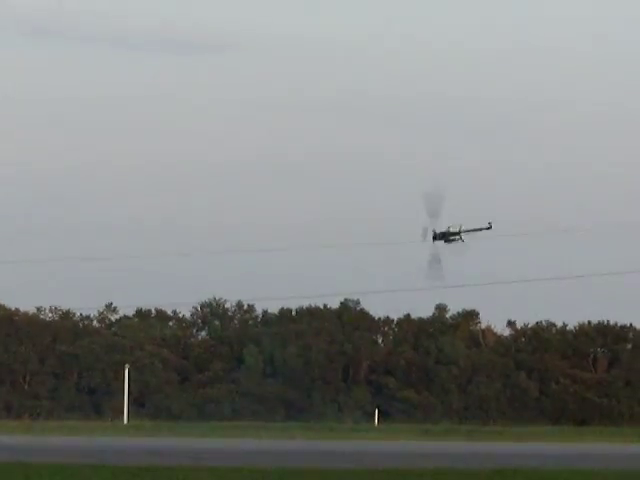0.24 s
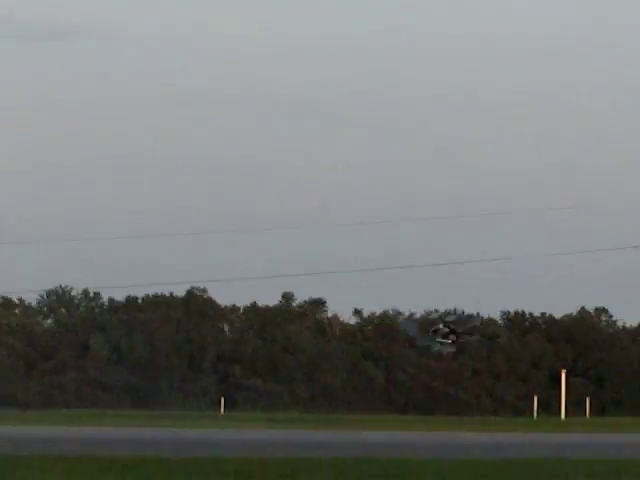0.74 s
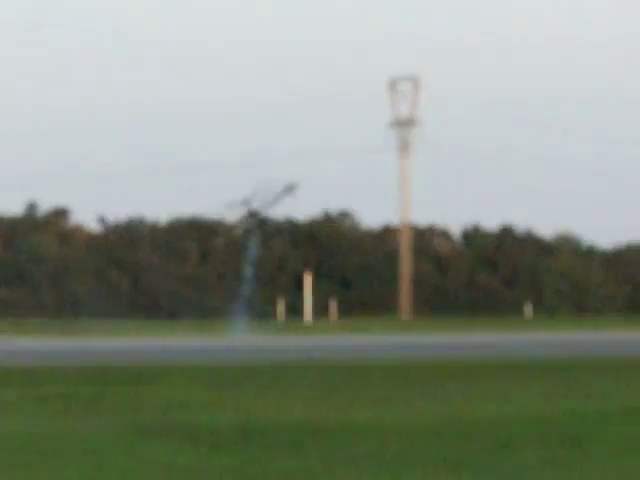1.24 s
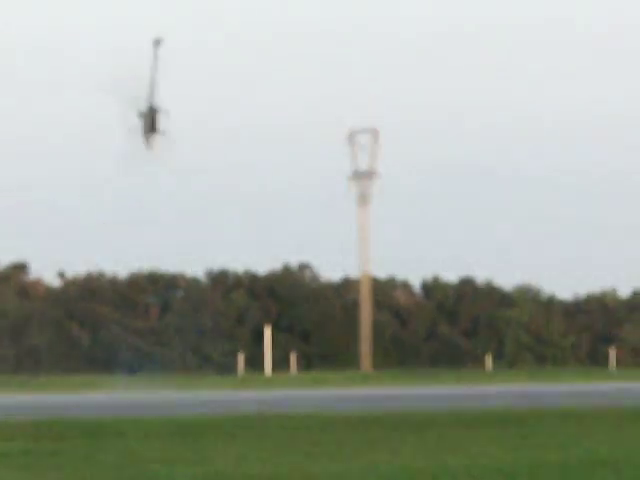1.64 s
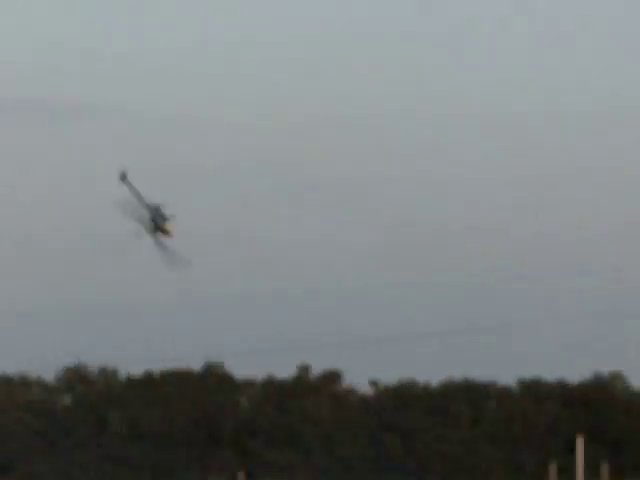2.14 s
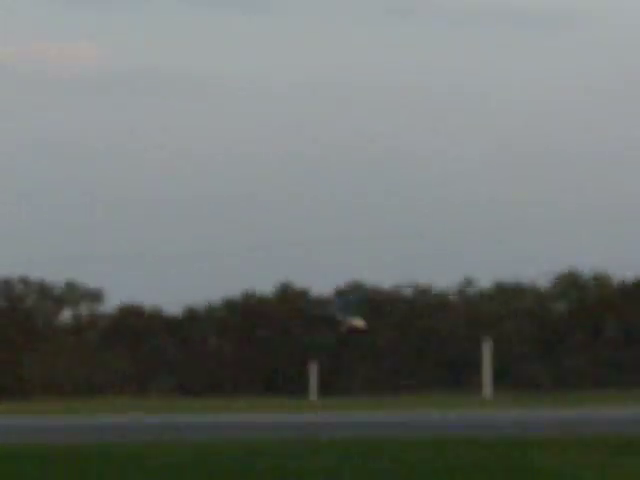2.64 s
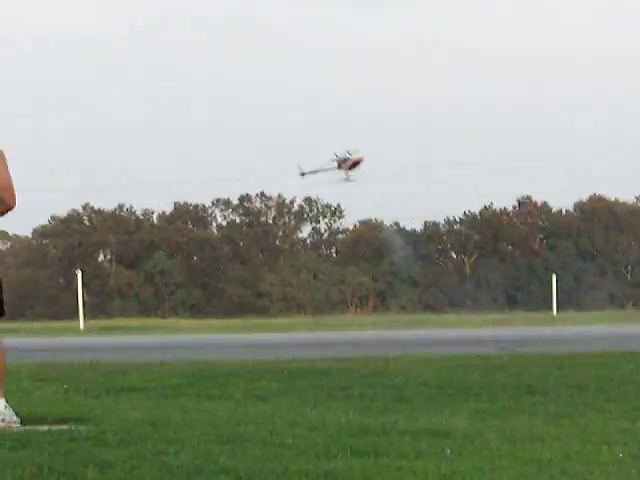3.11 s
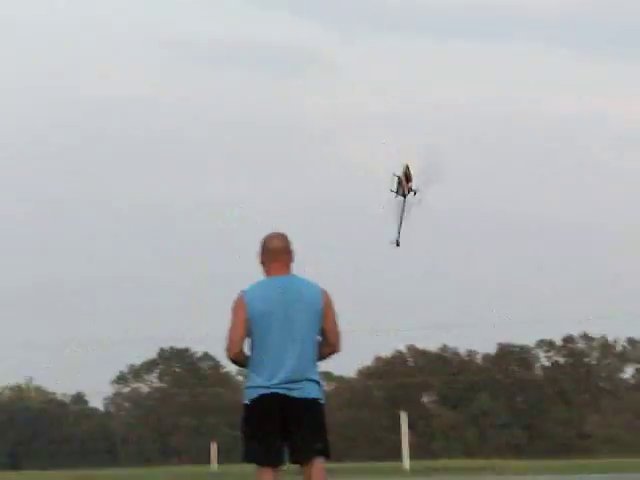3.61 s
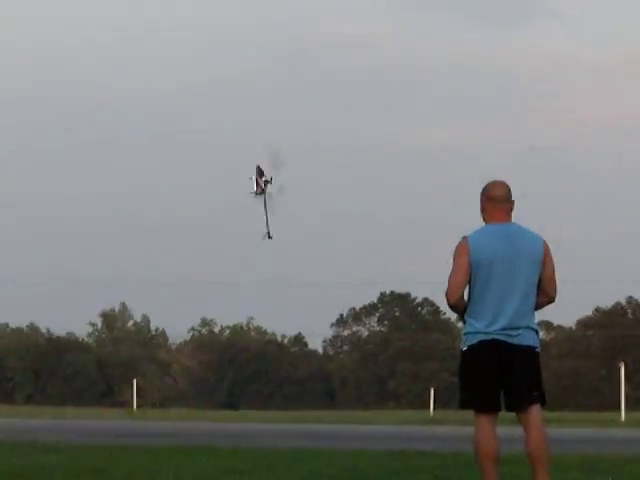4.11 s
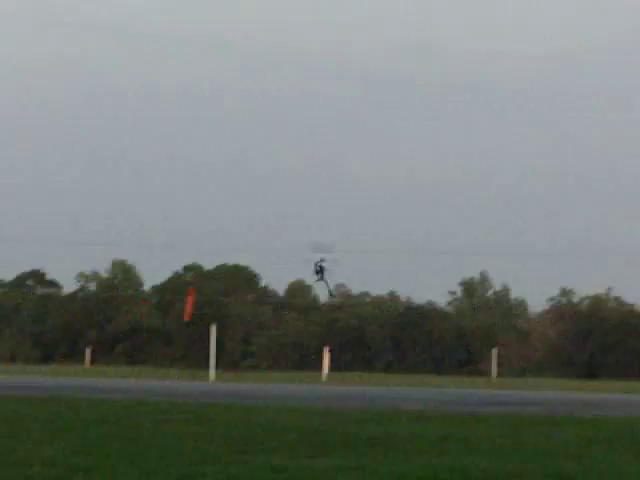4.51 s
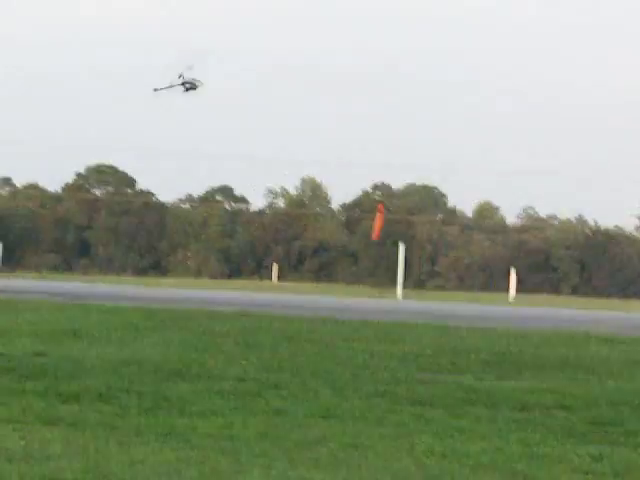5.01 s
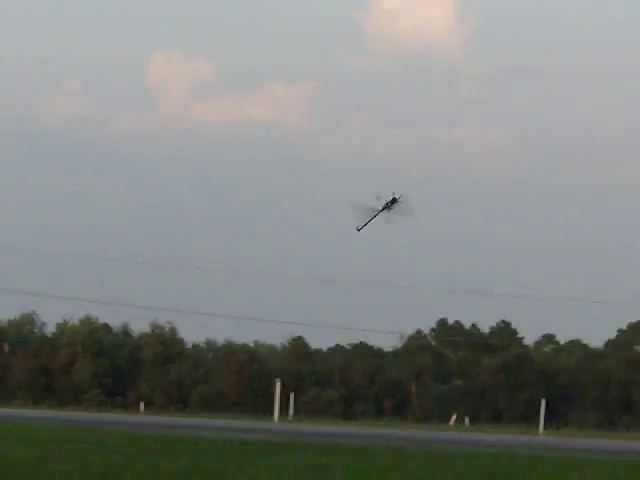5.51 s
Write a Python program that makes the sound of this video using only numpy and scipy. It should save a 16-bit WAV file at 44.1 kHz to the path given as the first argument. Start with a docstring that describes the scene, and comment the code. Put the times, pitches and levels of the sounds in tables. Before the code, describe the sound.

A small glow-engine model helicopter flies hard over a grass field. Its piercing, nasal exhaust whine continuously climbs and sags, with a hollow sweeping colour from the ground echo. Rapid rotor flutter runs underneath, and six short pulls bring harsh, ripping blade slaps. The outdoor space is open and almost dry, captured by a small stereo microphone with a limited top end.

```python
"""A model helicopter with a two-stroke glow engine flips and swoops over an open field.
From the start its exhaust whines, gears tie both rotors to the engine, and a light hush lies under all.
The firing rate then rises and sags again and again, while the ground echo combs the whine.
Now and then one gliding harmonic rings out; from 0.8 s on, six hard pulls make the blades slap.
Pops are sums of cosines, rotor thumps and hums are low tones, and hiss and slaps are shaped noise."""
import sys
import numpy as np
from scipy import signal
from scipy.fft import rfft, irfft
from scipy.io import wavfile

SR = 44100
rng = np.random.default_rng(int(sys.argv[2]) if len(sys.argv) > 2 else 0)


def generate_wav(signal):
    """Clip the signal to [-1, 1] and save it as 16-bit WAV at the path in sys.argv[1]."""
    frames = np.transpose(np.atleast_2d(signal))
    scaled = np.clip(frames, -1, 1) * 32767
    pcm = np.round(scaled).astype(np.int16)
    wavfile.write(sys.argv[1], SR, pcm)


N = 253575
TIME = np.arange(N) / SR


def amp(db):
    """Turns decibels into a gain."""
    return 10 ** (np.asarray(db) / 20)


def unit(x):
    """Scales a sound to an rms (average strength) of one."""
    return x / np.sqrt(np.mean(x ** 2) + 1e-20)


def curves(rows, t=TIME):
    """Joins each column of a table by straight lines in time."""
    s, *columns = np.transpose(rows)
    return [np.interp(t, s, column) for column in columns]


def read(points, hz):
    """Reads a table of values along a logarithmic frequency axis."""
    f, value = np.transpose(points)
    return np.interp(np.log(hz + 1), np.log(f + 1), value)


def colour(x, points):
    """Filters a sound by a spectrum in dB; the result has an rms of one."""
    gain = amp(read(points, np.fft.rfftfreq(N, 1 / SR)))
    return unit(irfft(rfft(x) * gain, N))


def wander(hz):
    """Smooth chance with an rms of one, fading out above about hz."""
    smoothing = np.exp(-(np.fft.rfftfreq(N, 1 / SR) / hz) ** 2)
    return unit(irfft(rfft(rng.standard_normal(N)) * smoothing, N))


def puffs(turns, length, between):
    """A burst of noise once a turn, dying within a share of the turn, over a steady hiss."""
    strength = between + np.exp(-(turns % 1) / length)
    return unit(strength * rng.standard_normal(N))


def ticks(turns):
    """One sharp pulse a turn, a little uneven in strength."""
    pulse = np.diff(np.floor(turns), prepend=0)
    return unit(pulse * (1 + .2 * wander(40)))


def swell(s, half):
    """A smooth rise and fall around a moment."""
    return np.exp(-.5 * ((TIME - s) / half) ** 2)


def pulls():
    """Strength of the blades' crack and of their thud through the hard pulls."""
    # hard pulls, when the blades strike their own wake: t/s, half length/s, crack level/dB, thud level/dB
    moments = [(0.803, 0.09, -23, -41.5), (1.015, 0.052, -19.5, -31), (1.645, 0.044, -19.5, -26.5),
               (2.88, .045, -21.5, -32), (3.582, 0.12, -22.5, -42), (4.646, .07, -19.5, -28.5)]
    return sum(amp([[crack], [thud]]) * swell(s, half) for s, half, crack, thud in moments)


def radiate(drive, reflection=.8, grass_hz=7000, blend_hz=500):
    """Colours the exhaust by the muffler, the turning of the model and the echo off the grass."""
    # overall tone of the muffler: f/Hz, level/dB
    muffler = [(200, -31.5), (400, -15), (570, -13), (850, -16.5), (1400, -10), (2050, 2.5), (2450, -2),
               (3100, 3.5), (4000, 5), (4650, 6.5), (5100, 6.5), (5700, 5.5), (6350, 2), (6900, -7.5),
               (7700, -10), (8500, -26.5)]
    # narrow resonances of the muffler can, lit up by harmonics gliding through: f/Hz, half width/Hz, level/dB
    rings = [(2973, 150, 3.5), (3986, 30, 8), (4580, 65, 4.5), (5406, 32, -2.5), (5650, 63, 5.5)]
    # the ground echo lags more the higher the model flies: t/s, lag/s
    echo = [(0, 0.000451), (.38, 0.00062), (.75, 0.00026), (1.25, 0.00023), (1.53, 0.00064), (1.78, .00084),
            (2, .00089), (2.22, .0008), (2.43, .00057), (2.65, 0.00024), (3.07, .00025), (3.35, 0.000578),
            (4.08, 0.000618), (4.4, 0.00027), (4.8, 0.00022), (5.1, 0.00033), (5.35, 0.000501),
            (5.75, 0.00035)]
    # the exhaust's buzz below the whine: t/s, level/dB
    buzz = [(0, -46), (.5, -43.5), (1.3, -40.5), (1.8, -42), (2.45, -43), (2.7, -50.5), (3, -58),
            (3.3, -38.5), (3.6, -39), (4.1, -41.5), (4.5, -45.5), (4.9, -47), (5.25, -42), (5.55, -37)]
    # the whine as the model turns: t/s, low level/dB, middle level/dB, top level/dB
    whine = [(0, -26, -28.5, -31.5), (.13, -17.5, -20, -31), (.48, -22, -20, -32), (.7, -26, -20, -28.5),
             (.98, -29.5, -27, -27), (1.15, -27, -23, -27), (1.3, -25, -15.5, -23.5),
             (1.5, -26.5, -17.5, -30.5), (1.64, -23, -17, -28), (1.78, -30.5, -23, -32.5),
             (2.25, -33, -20.5, -31.5), (2.47, -32.5, -21.5, -31), (2.7, -36.5, -26.5, -38),
             (3.08, -35, -28.5, -31), (3.22, -34.5, -25, -32), (3.42, -23, -19, -28.5),
             (3.75, -31.5, -22, -26.5), (4.05, -30.5, -16, -26), (4.23, -31.5, -24, -32.5),
             (4.45, -23.5, -18, -28), (4.8, -25.5, -24, -32), (5.15, -29, -25.5, -27.5),
             (5.5, -22, -20.5, -24), (5.75, -25.5, -15.5, -28.5)]
    # where buzz and the three whine bands meet: f/Hz
    edges = [1500, 3300, 5100]
    frame = 512  # samples
    overlap = frame * 3 // 4
    bins, frames, spectra = signal.stft(drive, SR, nperseg=frame, noverlap=overlap)
    hz, (lag,) = bins[:, None], curves(echo, frames)
    # at a grazing angle the echo comes back inverted and a little dull
    comb = 1 - reflection * np.exp(-hz / grass_hz - 2j * np.pi * hz * lag)
    ring_db = sum(db / (1 + ((hz - centre) / half) ** 2) for centre, half, db in rings)
    shape = amp(read(muffler, hz) + ring_db) * comb
    # share of the sound above each edge; neighbouring shares subtract to give a band
    above = [1] + [np.clip((hz - edge) / blend_hz + .5, 0, 1) for edge in edges] + [0]
    field = 0
    for k, db in enumerate(curves(buzz, frames) + curves(whine, frames)):
        band = shape * (above[k] - above[k + 1])
        # evens out the band's strength, so that only the table sets its level
        field = field + amp(db) * band / np.sqrt(np.mean(abs(band) ** 2, axis=0))
    return signal.istft(spectra * field, SR, nperseg=frame, noverlap=overlap)[1][:N]


def exhaust(turns, blades, sway=0.0063, flutter=0.16):
    """One pop a firing, with a puff of hiss that grows in a pull; the airframe sways once a rotor turn."""
    # harmonics that the shape of each pop favours or lacks: harmonic number, level/dB
    pop_shape = [(2, 1.5), (3, 3), (5, 2.5), (6, -0.5), (7, -1.5), (8, 1.5), (9, -2.5), (10, -1.5),
                 (12, -3), (13, -3), (14, -1), (16, 2), (18, -1.5), (19, 4), (20, 5), (22, 1)]
    jitter, jitter_hz = .0042, 290  # unevenness of the firing (turns) and how fast it changes (Hz)
    rasp_calm = .11  # share of hiss in the exhaust's power between pulls
    rasp_pull, rasp_knee_db = .55, -23  # extra share in a pull; the crack level that adds half of it
    swayed = turns + sway * np.sin(np.pi * blades) + jitter * wander(jitter_hz)
    pops = 0
    for k in range(2, 33):
        # each harmonic wavers in strength and phase as the model tumbles
        waver = amp(read(pop_shape, k) + 3.8 * wander(5))
        pops = pops + waver * np.cos(2 * np.pi * k * swayed + 1.8 * wander(1.5))
    bite, _ = pulls()
    rasp = np.clip(rasp_calm + rasp_pull * bite / (bite + amp(rasp_knee_db)), 0, 1)
    hiss = puffs(turns, length=0.55, between=0.91)
    drive = np.sqrt(1 - rasp) * unit(pops) + np.sqrt(rasp) * hiss
    tremble = 1 + flutter * wander(140)
    return radiate(unit(drive * tremble)) + tremble * flares(swayed)


def hums(turns, engine_db=-1, overtone_db=-13, waver_db=1.2):
    """The exhaust's fundamental beats against the tail rotor just above it."""
    # the exhaust's fundamental, before engine_db: t/s, level/dB
    hum = [(0, -33), (.33, -33), (.8, -26.5), (.95, -27.5), (1.25, -19.5), (1.5, -33), (1.63, -29),
           (1.78, -39), (2.05, -40.5), (2.3, -34), (2.85, -35), (3.3, -27.5), (4.1, -40), (5.15, -32),
           (5.6, -28.5), (5.75, -30.5)]
    # the tail rotor's hum: t/s, level/dB
    tail_hum = [(0, -36.5), (.5, -56), (.78, -36.5), (1.25, -36.5), (1.5, -60.5), (2.2, -52), (2.6, -42),
                (3.5, -44.5), (4, -35.5), (4.6, -39.5), (5.1, -36), (5.75, -39.5)]
    tail_per_firing = 1.1  # tail rotor cycles a firing
    phase = 2 * np.pi * (tail_per_firing * turns + rng.random())
    engine_gain = amp(engine_db + curves(hum)[0] + waver_db * wander(8.4))
    engine = engine_gain * np.sin(2 * np.pi * turns)
    tail = amp(curves(tail_hum)[0]) * (np.sin(phase) + amp(overtone_db) * np.sin(2 * phase))
    return np.sqrt(2) * (engine + tail)


def main_rotor(blades, second_db=-14, third_db=-20, fall_db=-4.0, thud_fall_db=-4.0,
               facing_db=-10, churn_db=-9, pull_churn_db=-7, tick=0.82):
    """Each blade gives a pressure dip, sharper in a pull or strong swish, churns the air and ticks."""
    # the thump as the disc tilts toward and away from the listener: t/s, level/dB
    thump_level = [(0.0, -24.5), (0.22, -34), (0.51, -25.5), (1.38, -28), (1.58, -19.5), (1.7, -27.5),
                   (2.82, -38), (2.88, -26.5), (3.22, -46), (3.57, -18.5), (3.67, -22.5), (3.76, -39.5),
                   (3.92, -26), (4.39, -29.5), (4.51, -39.5), (4.58, -23.5), (4.92, -35.5), (5.25, -23.5),
                   (5.61, -32), (5.75, -22)]
    # swish of the blade tips: t/s, level/dB
    swish_level = [(0, -35.5), (.25, -30.5), (.8, -33), (1.1, -37), (1.45, -38.5), (1.63, -28),
                   (1.78, -42.5), (3.15, -41), (3.5, -33.5), (3.95, -27.5), (4.65, -32.5), (4.87, -42),
                   (5.15, -38), (5.75, -32)]
    # tone of the swish: f/Hz, level/dB
    swish_tone = [(150, -22), (400, -10), (700, -5), (1100, 0), (1450, -1), (1900, -10), (3200, -16),
                  (5000, -26), (8000, -48)]
    # tone of the air torn by the blades: f/Hz, level/dB
    churn_tone = [(30, -19.5), (80, 4), (150, -6), (230, 11), (330, 13), (450, -1.5), (900, -6),
                  (3000, -60.5)]
    level, swish = amp(curves(thump_level)[0]), amp(curves(swish_level)[0])
    _, thud = pulls()
    sharp = thud + amp(facing_db) * swish
    overtones = [second_db] + [third_db + k * fall_db for k in range(5)]
    gains = [level]
    for k, db in enumerate(overtones):
        gains.append(amp(db) * level + amp(k * thud_fall_db) * sharp)
    tones = sum(gain * np.cos(2 * np.pi * (k + 1) * blades) for k, gain in enumerate(gains))
    thump = -np.sqrt(2) * tones  # the minus sign makes each passing a dip
    churn_gain = amp(churn_db) * swish + amp(pull_churn_db) * thud
    churn = churn_gain * colour(puffs(blades + 0.64, length=0.28, between=0.22), churn_tone)
    tips = colour(tick * ticks(blades) + puffs(blades, length=.15, between=.33), swish_tone)
    return thump + churn + swish * tips


def hush():
    """A steady, light outdoor hush of shaped noise."""
    # tone of the hush: f/Hz, level/dB
    air_tone = [(20, 2), (60, 3.5), (150, 9), (400, -13), (1000, -18), (4000, 4.5), (8000, -28)]
    return amp(-34) * colour(rng.standard_normal(N), air_tone)


def field_scatter(x, t60=0.84, level_db=-16):
    """Faint, diffuse reflections from the open field, different at each side."""
    t = np.arange(SR // 2) / SR
    taps = rng.standard_normal((2, len(t))) * amp(-60 * t / t60)  # fades by 60 dB in t60 seconds
    taps = taps / np.linalg.norm(taps[0])
    return amp(level_db) * signal.fftconvolve(x[None], taps, axes=1)[:, :N]


def flares(turns):
    """Now and then one gliding harmonic rings out as it crosses a narrow resonance of the muffler."""
    # harmonics that ring out clear of the whine: t/s, half length/s, harmonic number, level/dB
    ringing_harmonics = [(.06, 0.02, 20, -19.5), (0.454, 0.079, 20, -16.5), (0.496, 0.047, 17, -16.5),
                         (0.723, 0.1, 7, -24), (0.905, 0.15, 15, -19.5), (1.05, 0.019, 16, -21),
                         (1.157, 0.14, 11, -21.5), (1.26, .035, 17, -18.5), (1.338, 0.0099, 20, -9.5),
                         (1.43, 0.028, 16, -13), (1.687, 0.0071, 21, -14), (1.765, 0.066, 15, -12),
                         (1.78, 0.055, 16, -15), (1.967, .02, 15, -10.5), (2.299, 0.18, 8, -39.5),
                         (2.442, 0.055, 10, -23.5), (2.627, 0.056, 15, -17.5), (2.792, 0.11, 15, -26.5),
                         (2.979, 0.054, 17, -25.5), (3.08, 0.1, 8, -40), (3.29, 0.057, 17, -27.5),
                         (3.461, 0.089, 14, -18.5), (3.557, 0.097, 16, -16), (3.698, 0.032, 20, -22.5),
                         (3.96, .025, 17, -17.5), (4.098, .06, 15, -10.5), (4.386, 0.058, 20, -14.5),
                         (4.499, 0.057, 7, -27.5), (4.95, 0.08, 8, -45), (4.938, 0.25, 17, -25.5),
                         (5.252, 0.037, 20, -17.5), (5.435, 0.093, 10, -26), (5.622, 0.032, 10, -14)]
    total = 0
    for s, half, k, db in ringing_harmonics:
        tone = np.cos(2 * np.pi * (k * turns + rng.random()))
        total = total + amp(db) * swell(s, half) * tone
    return np.sqrt(2) * total


def slaps(blades, crack=0.29):
    """In a hard pull every blade cracks through the wake of the one before."""
    # tone of the slap: f/Hz, level/dB
    slap_tone = [(60, 12.5), (200, 16.5), (450, -6), (1200, -11), (2500, 8.5), (4500, 13.5), (6000, 12),
                 (7500, -3.5), (8500, -20)]
    bite, _ = pulls()
    spray = puffs(blades, length=.13, between=.12)
    return bite * colour(crack * ticks(blades) + spray, slap_tone)


def scene():
    """One crankshaft drives every part of the helicopter, over a light outdoor hush."""
    # the firing rate rises and sags again and again: t/s, firing rate f/Hz
    engine = [(0.0, 244.6), (0.11, 247.1), (0.54, 283.9), (0.8, 301), (0.96, 306.4), (1.1, 278.7),
              (1.18, 276.6), (1.55, 298.1), (1.75, 264.9), (1.89, 273.8), (2.07, 256.2), (2.53, 301.3),
              (2.74, 310.3), (2.82, 308.7), (3.01, 265.5), (3.12, 257.7), (3.52, 288.7), (3.71, 280),
              (3.83, 294.5), (4.03, 274.1), (4.18, 270.1), (4.31, 272.3), (4.56, 305.2), (4.72, 269.4),
              (4.79, 262.5), (4.98, 264.7), (5.14, 253.7), (5.33, 258.8), (5.64, 296.3), (5.75, 305)]
    blades_per_firing = .2303  # main rotor blades passing a firing
    turns = np.cumsum(curves(engine)[0]) / SR
    blades = blades_per_firing * turns + rng.random()
    bright = exhaust(turns, blades) + slaps(blades)
    deep = hums(turns) + main_rotor(blades)
    return bright + deep + field_scatter(bright + amp(-9.5) * deep) + hush()


def record(dry):
    """Two close microphone ports colour the sides differently; peaks clip; then the band limit."""
    # f/Hz, left minus right level/dB
    port_balance = [(60, 2), (1200, 0), (1700, 5.5), (2600, -6), (4600, -9), (6200, 11), (8000, -3)]
    # f/Hz, phase by which left leads/radians
    port_phase = [(0, 0), (1640, -0.2), (1890, 0.1), (2410, -1.3), (3530, 0.4), (4480, -0.0), (5080, 1.8),
                  (5600, 1.4), (6290, -0.4), (6630, 0.1), (7320, -0.7), (8100, 0.1)]
    # the capsules' low cuts differ: f/Hz, phase by which left leads/radians
    bass_lead = [(60, .25), (250, 0.13), (600, 0)]
    edge_hz = 8550
    hz = np.fft.rfftfreq(N, 1 / SR)
    lead = read(port_phase, hz) + read(bass_lead, hz)
    # each side takes half of the difference, in opposite directions
    half = amp(read(port_balance, hz) / 2) * np.exp(.5j * lead)
    clipped = np.clip(irfft(rfft(dry) * np.array([half, 1 / half]), N), -1, 1)
    low_pass = signal.firwin(511, edge_hz, window=("kaiser", 9), fs=SR)
    return signal.oaconvolve(clipped, low_pass[None], "same")


dry = scene()
out = record(dry)
generate_wav(out)
```